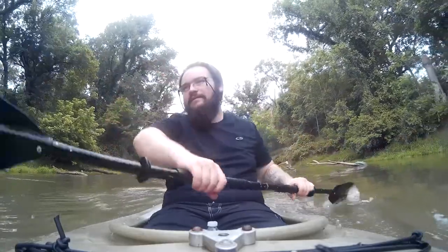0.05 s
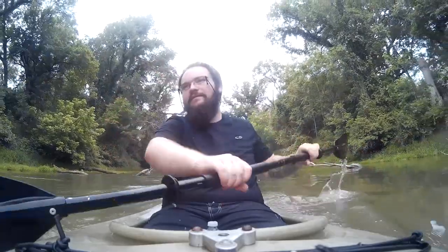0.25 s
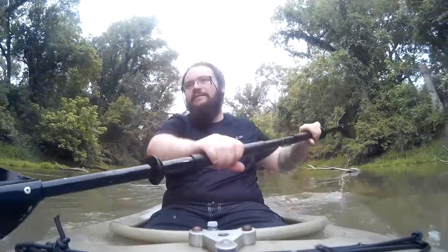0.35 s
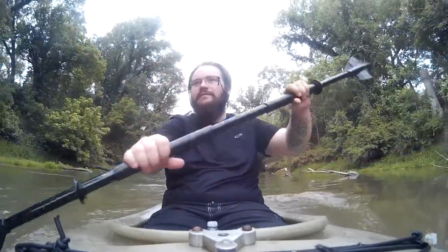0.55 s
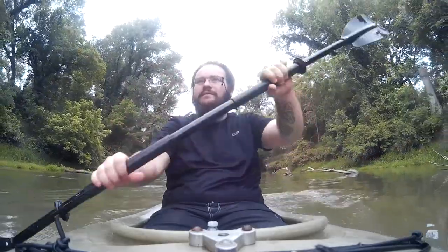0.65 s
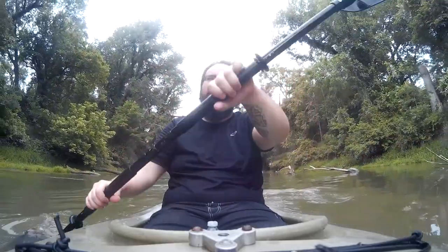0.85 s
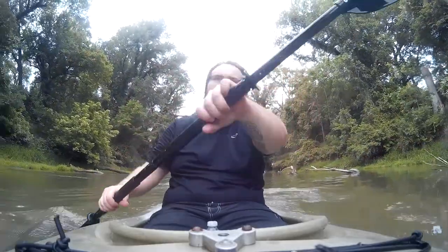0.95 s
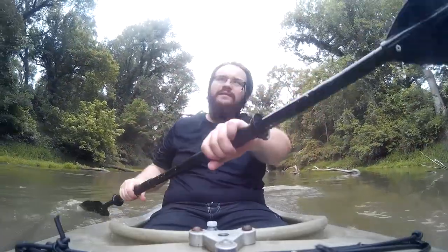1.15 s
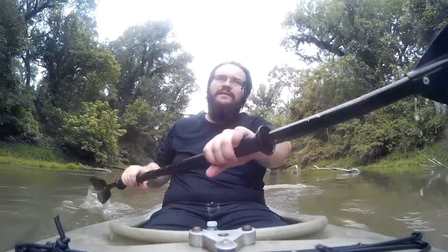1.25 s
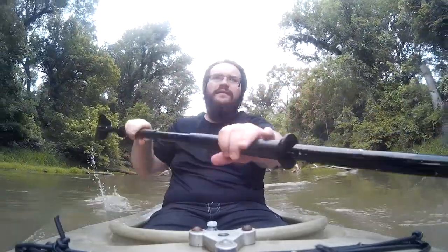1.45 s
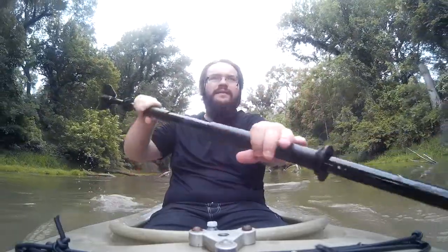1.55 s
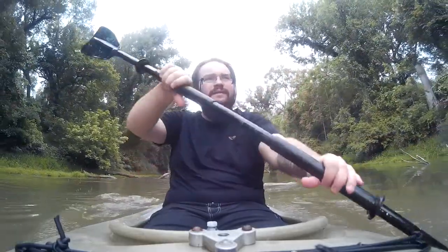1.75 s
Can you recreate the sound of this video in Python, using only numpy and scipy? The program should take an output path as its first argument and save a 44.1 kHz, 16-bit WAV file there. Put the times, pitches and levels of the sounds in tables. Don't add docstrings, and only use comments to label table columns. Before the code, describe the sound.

A paddle shaft knocks a hollow plastic kayak hull once, hard and deep, with quiet water around

```python
import sys
import numpy as np
from scipy import signal
from scipy.io import wavfile
from scipy.ndimage import uniform_filter1d

SR = 44100
rng = np.random.default_rng(int(sys.argv[2]) if len(sys.argv) > 2 else 0)


def elevation(decibels):
    levels = np.asarray(decibels, float)
    return 10 ** (levels / 20)


def materialize(psi):
    bounded = np.clip(np.atleast_2d(psi).T, -1, 1)
    quanta = np.round(bounded * 32767).astype(np.int16)
    wavfile.write(sys.argv[1], SR, quanta)


N = 79380


def evened(x):
    return x / np.sqrt(np.mean(x ** 2) + 1e-20)


def add(mix, start_s, sound):
    part = mix[round(start_s * SR):][:len(sound)]
    part += sound[:len(part)]


def bell(centre_s, width_s):
    return np.exp(-.5 * ((np.arange(N) / SR - centre_s) / width_s) ** 2)


def noise(shape, patchy_db, flicker_db):
    frames, hz = N // 256 + 5, np.fft.rfftfreq(1024, 1 / SR)
    real, imaginary, patches = rng.standard_normal((frames, 513, 3)).T
    patches = uniform_filter1d(patches, size=8, axis=0)
    patches = evened(uniform_filter1d(patches, size=6, axis=1))
    flicker = evened(uniform_filter1d(rng.standard_normal(frames), size=3))
    shape_hz, shape_db = np.transpose(shape)
    tone_db = np.interp(np.log(hz + 1), np.log(shape_hz + 1), shape_db)[:, None]
    gain = elevation(tone_db + patchy_db * patches + flicker_db * flicker)
    spectra = (real + 1j * imaginary) * gain * (hz > 15)[:, None]
    return evened(signal.istft(spectra, nperseg=1024, noverlap=768)[1][:N])


def band(grit, low_hz, high_hz, order):
    sos = signal.butter(order, [2 * low_hz / SR, 2 * high_hz / SR], "band", output="sos")
    return signal.sosfilt(sos, grit)


def swell(t, hz):
    rise_s, rise_cycles = .002, .6
    return (1 - np.exp(-t / (rise_s + rise_cycles / hz))) ** 2


def deck_ring(t, bright_db, detune, skid):
    # pitch_hz [Hz], level_db [dB], t60_s [s]
    deck_modes = [(193.4, -18.5, .3), (275, -4, .07), (356, -10.5, 0.096), (440, -22.5, 0.1),
                  (530, 0, 0.046), (568, -28.5, 0.46), (728, -19, 0.048), (958, -20.5, 0.044),
                  (1192, -18.5, 0.036), (1465, -1.5, 0.019), (1631, -4.5, 0.015), (1830, -11, 0.019),
                  (2246, -28, 0.021), (2437, -14, 0.013)]
    bent = t + skid * np.minimum(t, .01) ** 2
    ring = np.zeros(len(t))
    for k, (hz, level_db, t60) in enumerate(deck_modes):
        fade = elevation(level_db + bright_db * np.log2(hz / 700) - 60 * t / t60)
        ring += (-1) ** k * fade * swell(t, hz) * np.sin(2 * np.pi * hz * detune * bent)
    return ring


def contact(level_db, bright_db, detune, skid, hardest_db):
    grit = rng.standard_normal(12000)
    t = np.arange(len(grit)) / SR

    crack_s = .0011
    crack = band(grit, 2600, 5170, order=3) * np.exp(-t / crack_s) * t / crack_s
    extra_db = 1.5 * (level_db - hardest_db)
    crack *= elevation(-20 + extra_db)

    rattle_db, rattle_t60 = -15, .06
    rattle = band(grit[::-1], 200, 2000, order=4) * elevation(rattle_db - 60 * t / rattle_t60)
    rattle *= np.minimum(t / .0013, 1)

    shaft_hz, shaft_db, shaft_t60 = 467, 6, .022
    shaft = elevation(shaft_db + .6 * extra_db - 60 * t / shaft_t60) * swell(t, shaft_hz)
    shaft *= np.sin(2 * np.pi * shaft_hz * t)
    return elevation(level_db) * (deck_ring(t, bright_db, detune, skid) - shaft + crack + rattle)


def knocks():
    # start_s [s], level_db [dB], bright_db [dB per octave], detune [ratio], skid [half the pitch rise
    # per s]
    contacts = [(.2160, -17.5, 2, 1.011, 1), (0.2365, -38, 5, 1., 21), (0.2576, -26, 2.5, 0.95, 3.5),
                (0.2656, -35, 0.5, 1., 4), (.2697, -37, -1, 1.02, 5), (0.277, -49.5, -1., .95, 1),
                (.287, -41.5, -4.5, 0.88, -13.5), (1.2303, -44.5, 0.5, .92, 3), (1.246, -54, 5, 0.88, 4),
                (1.288, -58.5, -3, 1, -2.5), (1.383, -54, -2, 0.85, 7)]
    out = np.zeros(N)
    for start_s, *blow in contacts:
        add(out, start_s, contact(*blow, hardest_db=contacts[0][1]))
    return out


def boom():
    # pitch_hz [Hz], swing [signed amplitude], t60_s [s], lag_s [s]
    hull_modes = [(36.3, .016, .7, -.0016), (48.06, -.030, 1.2, .0037), (58.5, -.144, .153, .0045),
                  (67.15, .023, 3, -.0016), (72.1, .008, 3, .0063), (87.1, .073, .236, -.0005),
                  (99, .3, .03, .0051), (140.3, .023, .32, -.0002), (192, .055, .067, -.0007)]
    boom_s, rise_s = .2222, .0046
    damp_db, damp_s, damp_hz = -12, .27, 42
    since = np.arange(N) / SR - boom_s
    out = np.zeros(N)
    for hz, swing, t60, lag in hull_modes:
        t = np.maximum(since - lag, 0)
        fade_db = -60 * t / t60
        if hz > damp_hz:
            fade_db += np.maximum(damp_db * (t / damp_s) ** 8, -200)
        out += swing * elevation(fade_db) * (1 - np.exp(-t / rise_s)) * np.sin(2 * np.pi * hz * t)

    sway_hz = 38.9
    sway = bell(.59, .039) * (since > 0) * np.sin(2 * np.pi * sway_hz * since)
    return out + elevation(-58.5) * sway + slosh(since)


def slosh(since):
    # pitch_hz [Hz], level_db [dB per Hz]
    slosh_shape = [(20, -14), (33, -6), (40, 13), (48, 3), (95, -12), (200, -33), (400, -55)]
    onset = np.minimum(np.maximum(since, 0) / .059, 1)
    return elevation(-60.5) * bell(.5, .11) * onset * noise(slosh_shape, patchy_db=3.0, flicker_db=3.0)


def bubble(level_db, hz, cycles):
    glide = .075
    u = np.arange(int(4 * cycles * SR / hz)) * hz / SR / cycles
    envelope = 4 * u * np.exp(-3 * u) * 2
    return elevation(level_db) * envelope * np.sin(2 * np.pi * cycles * u * (1 + glide * (u - 1) / 2))


def dripping():
    # start_s [s], level_db [dB], pitch_hz [Hz], length [cycles]
    drip_events = [(.011, -59, 1535, 11), (.033, -53.5, 490, 1.85), (.064, -60.5, 3190, 5.3),
                   (.093, -54.5, 520, 4), (.107, -65.5, 1334, 12.), (.158, -64, 886, 9.8),
                   (.174, -62.5, 897, 16.4), (.535, -67, 2270, 12.), (.56, -62.5, 2040, 12),
                   (0.608, -61, 4360, 20), (0.617, -56, 2430, 9.6), (.652, -65, 1565, 11),
                   (0.701, -62.5, 1240, 6), (1.0207, -57.5, 1860, 8.2), (1.0478, -54, 3900, 9.5),
                   (1.0473, -62, 2600, 4.5), (1.186, -69, 2270, 8.), (1.648, -55.5, 1376, 7.),
                   (1.665, -65, 1580, 9.5)]
    out = np.zeros(N)
    for start_s, *drop_sound in drip_events:
        add(out, start_s, bubble(*drop_sound))
    return out


def fizz():
    rate_per_s, level_db, spread_db = 60, -75, 3.5
    out = np.zeros(N)
    for hz in np.geomspace(400, 4500, num=12):
        chance, strength = rng.random(N), rng.exponential(1, N)
        bursts = (chance < rate_per_s / 12 / SR) * elevation(spread_db * np.minimum(strength, 3))
        one = bubble(level_db - 3 * np.log2(hz / 1000), hz, 3.7)
        out += signal.oaconvolve(bursts, one)[:N]
    return out


def lapping():
    # time_s [s], level_db [dB]
    lap_levels = [(0, -64), (.2, -66), (.3, -58), (.45, -58), (.62, -64.5), (.72, -70), (.95, -76),
                  (1.03, -66), (1.15, -66), (1.3, -62), (1.4, -65), (1.48, -63), (1.6, -68.5), (1.8, -66)]
    # pitch_hz [Hz], level_db [dB per Hz]
    lap_shape = [(20, -15), (45, 1.5), (100, -1), (200, -7), (500, -13), (1000, -23.5), (1600, -18),
                 (3000, -38.5)]
    time_s, level_db = np.transpose(lap_levels)
    level = elevation(np.interp(np.arange(N) / SR, time_s, level_db))
    return level * noise(lap_shape, patchy_db=1.7, flicker_db=1.0)


def swish():
    # pitch_hz [Hz], level_db [dB per Hz]
    swish_shape = [(100, -30), (300, 3), (600, 2), (1500, -8.5), (2500, -8), (4000, -13), (8000, -15),
                   (15000, -27)]
    return elevation(-63) * bell(.42, .1) * noise(swish_shape, patchy_db=1.0, flicker_db=.7)


def insect():
    pitch_hz, blur_hz = 9540, 27
    real, imaginary = rng.standard_normal((2, N))
    r = np.exp(-np.pi * blur_hz / SR)
    waver = signal.lfilter([1 - r], [1, -r], real + 1j * imaginary)
    tone = evened((waver * np.exp(2j * np.pi * pitch_hz * np.arange(N) / SR)).real)
    return elevation(-80) * bell(.42, .14) * tone


def hiss():
    # pitch_hz [Hz], level_db [dB per Hz]
    hiss_shape = [(20, -1.5), (300, -5), (600, -11.5), (1100, -15.5), (2000, -18), (5000, -22),
                  (14500, -22.5), (16000, -28.5)]
    return elevation(-65) * noise(hiss_shape, patchy_db=.58, flicker_db=.4)


def scene():
    mix = knocks() + boom()
    mix += dripping() + fizz() + lapping() + swish()
    mix += insect() + hiss()
    return mix[None]


def roll_off(x):
    return signal.sosfilt(signal.butter(12, 15770, fs=SR, output="sos"), x)


def record(dry):
    low_pass = signal.firwin(511, 15850, window=("kaiser", 9), fs=SR)
    limited = signal.oaconvolve(dry, low_pass[None], "same")
    return roll_off(limited)


dry = scene()
out = record(dry)
materialize(out)
```